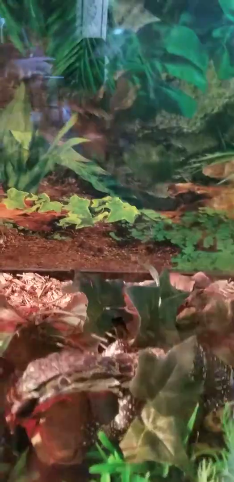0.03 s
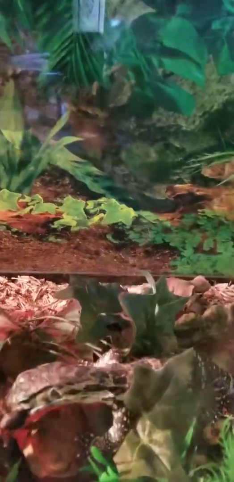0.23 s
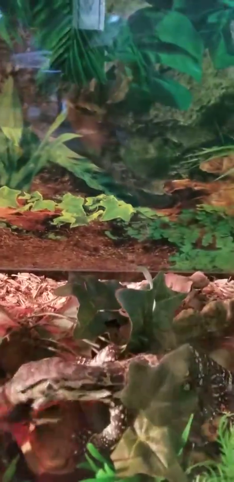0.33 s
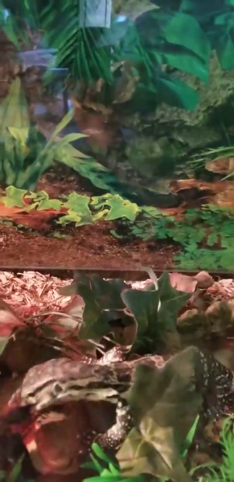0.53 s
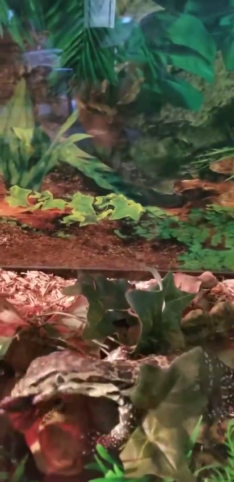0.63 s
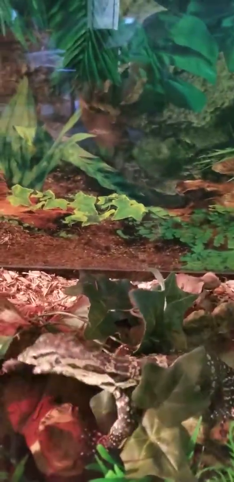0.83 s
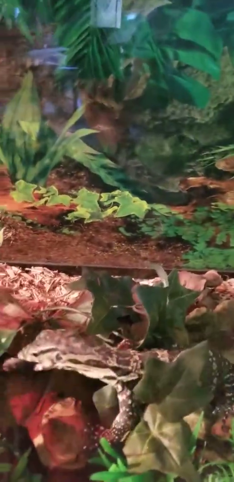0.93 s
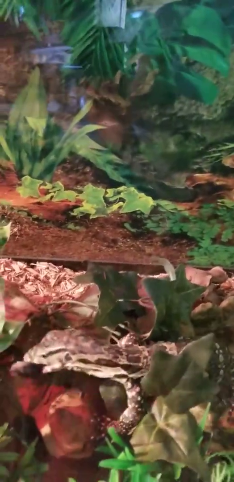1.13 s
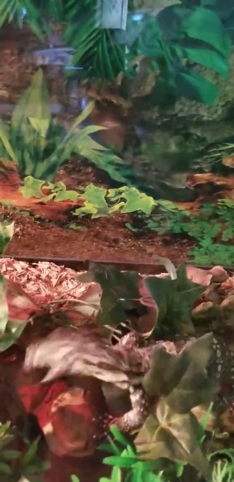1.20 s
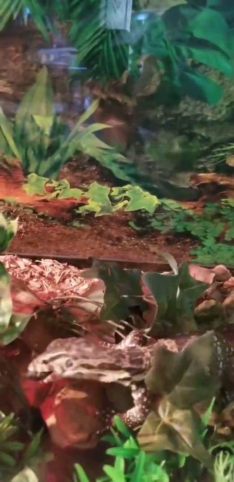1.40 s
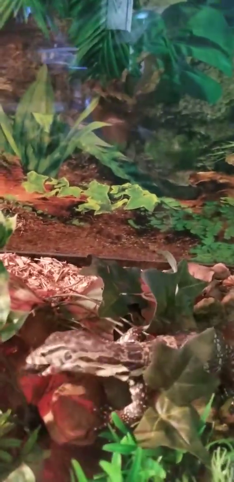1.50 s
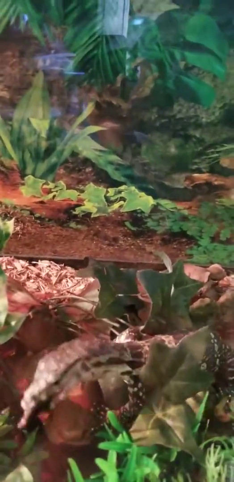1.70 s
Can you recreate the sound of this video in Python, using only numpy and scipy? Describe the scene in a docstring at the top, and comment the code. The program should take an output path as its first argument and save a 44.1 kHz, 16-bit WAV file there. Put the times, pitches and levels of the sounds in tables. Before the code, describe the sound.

Sharp, thumping knocks and a brief dry rustle as a lizard shifts in a terrarium.

```python
"""Knocks in a terrarium as a lizard shifts: one that rebounds in a quick clatter, then a single one.
Each is a deep thump of the enclosure and a hard crack that reaches the left first; the panels ring
briefly, and the walls, tank and room scatter the blow. A short dry rustle starts just ahead of the
knocks and fades under them: tiny slips excite hollow resonances and a dry fizz over a low rub.
Two dry touches leave a thin high ring. Underneath lie quiet room air and a faint mains hum."""
import sys
import numpy as np
from scipy import signal
from scipy.fft import rfft, irfft
from scipy.io import wavfile

SR = 44100
rng = np.random.default_rng(int(sys.argv[2]) if len(sys.argv) > 2 else 0)


def unload_audio(sound):
    """Save the sound as a 16-bit wav file, at the path given as the first command line argument."""
    columns = np.transpose(np.atleast_2d(sound))
    # keep every value between -1 and 1, then stretch to whole-number steps
    steps = np.round(np.clip(columns, -1, 1) * 32767)
    wavfile.write(sys.argv[1], SR, steps.astype(np.int16))


N = 77175

# the blows (time [s], thump gain [dB], crack gain [dB], crack tilt [dB/octave], panel ring gain [dB])
KNOCKS = [(.2220, -1.5, -7.5, 2.5, 10), (0.2497, -3, -7.5, 0.5, -4), (0.2634, -11.5, -16, -1, 3.5),
          (.2730, -20.5, -23.5, -9.5, 5.5), (0.8667, -5.5, -12.5, -1, 2.5)]
# tone of the enclosure's thump (frequency [Hz], gain [dB])
THUMP_EQ = [(15, -12.5), (40, 22), (75, 32.5), (150, 34.5), (300, 33), (460, 30.5), (600, 18.5),
            (1000, -11), (3000, -31), (16000, -72.5)]
# the thump leans left in the deep bass (frequency [Hz], left minus right [dB])
THUMP_PAN = [(40, 8.5), (90, 4), (180, 1.5), (300, 1), (500, -6)]
# tone of the crack on each side (frequency [Hz], gain [dB])
CRACK_LEFT_EQ = [(60, -40.5), (400, 10.5), (750, 26), (950, 6), (1300, 23.5), (2000, 17.5), (2400, 14),
                 (3800, 16), (5200, 13), (6300, 6), (7200, 9), (8500, -3.5), (10500, 0.5), (14000, -1.5),
                 (16500, -27.5)]
CRACK_RIGHT_EQ = [(60, -34.5), (400, 18.5), (740, 29.5), (1050, 22), (1700, 11.5), (2600, 22.5),
                  (3200, -20.5), (4000, 16.5), (5200, -3), (7000, -24), (9000, -26), (16500, -23.5)]
# panel modes (frequency [Hz], level [dB], t60 [s])
PANEL_MODES = [(72.4, -56.5, 0.81), (139, -42, .2), (196, -31, 0.078), (230.7, -44.5, 0.45),
               (324.7, -43, 0.38), (398, -42.5, .26), (834, -69, .3), (1256, -56.5, 0.17), (1275, -59, 0.2)]
# fader moves of the rustle (time [s], body level [dB], fizz level [dB], rub level [dB])
RUSTLE_FADERS = [(0, -60.5, -71, -59), (0.062, -58, -65, -51), (0.069, -41, -46.5, -53.5),
                 (.078, -40, -54, -51.5), (0.098, -36.5, -49, -53.5), (.143, -39, -51, -56),
                 (0.158, -35, -52, -44.5), (.208, -34.5, -59.5, -49), (0.223, -40.5, -62, -56),
                 (.295, -43, -64, -51), (.328, -43, -67, -48), (.34, -43.5, -56.5, -52),
                 (.39, -43, -59.5, -52.5), (.47, -49, -70.5, -61), (.55, -55, -82, -67.5),
                 (.65, -61, -78, -64), (.85, -72, -94, -83), (1.101, -100, -110, -77.5)]
# broad tone of the rustle's body (frequency [Hz], relative level [dB])
BODY_EQ = [(100, -50), (700, -30.5), (1050, -23.5), (1600, -17.5), (2500, -21.5), (4000, -34), (6000, -36),
           (8000, -48.5), (16000, -72)]
# hollow resonances in that body (frequency [Hz], width [Hz], left gain [dB], right gain [dB])
HOLLOW_MODES = [(1899, 43, -4.5, 2), (2040, 60, -7.5, -1.5), (2255, 32, -16, 4), (2597, 71, -12, -8.5),
                (3315, 150, -18, -18), (4450, 200, -30, -25), (5000, 150, -26, -18),
                (6590, 200, -23.5, -35.5)]
# tone of the dry fizz (frequency [Hz], relative level [dB])
FIZZ_EQ = [(100, -61), (3000, -8), (5000, 1.5), (6800, -6.5), (7900, -5), (8600, -13.5), (9300, -13.5),
           (9900, -1), (11500, -6), (12800, -2.5), (14000, -2), (15600, -7), (16300, -26)]
# the fizz is duller on the right (frequency [Hz], gain [dB])
FIZZ_RIGHT_EQ = [(3000, -3), (5500, -1.5), (8000, -23.5), (10000, -11), (16000, -25)]
# thin rings in the fizz (frequency [Hz], boost [dB])
FIZZ_RINGS = [(6600, 7.5), (7250, 8.5), (7890, -1), (9890, 3.5), (11100, 7), (12300, 4.5), (12800, 5.5)]
# tone of the low rub (frequency [Hz], relative level [dB])
RUB_EQ = [(20, -20.5), (60, -1.5), (130, -2.5), (250, -3.5), (550, -7), (800, -9.5), (1200, -19.5),
          (2500, -29), (4400, -16.5), (6000, -47), (16000, -65.5)]
# one touch opens the rustle, one is far fainter (time [s], level [dB], t60 [s], ring gain [dB])
TOUCHES = [(.065, -40, .06, -62), (.657, -67, .22, -58)]
# tone of the wash inside the tank (frequency [Hz], gain [dB])
TANK_EQ = [(300, -13.5), (1000, 11), (2700, 0.5), (4000, -12), (8000, -20)]
# room decay, floored at 0.02 s in use (frequency [Hz], t60 [s])
ROOM_T60 = [(60, 3), (300, 0.25), (1000, 3.8), (4000, -0.2), (16000, 18)]
# reverb send of the knocks (frequency [Hz], gain [dB])
ROOM_SEND = [(60, -31.5), (150, -19), (300, -23), (700, -34.5), (1300, -28), (2500, -22.5), (6000, -35),
             (16000, -35)]
# tone of the room air (frequency [Hz], relative level [dB])
AIR_EQ = [(15, -50), (28, -16), (60, 4.5), (110, -9), (160, -7.5), (235, -6), (290, -10.5), (370, -8.5),
          (520, -18.5), (780, -14.5), (1150, -36.5), (1700, -29), (2300, -19.5), (3200, -37), (4000, -28),
          (4650, -20), (6000, -37.5), (8300, -49), (12200, -32), (16000, -37.5)]
# left-right likeness of diffuse sound (frequency [Hz], correlation [-1..1])
LIKENESS = [(60, .55), (130, .72), (290, 1), (640, 0.43), (1410, -.25), (3100, 0), (15000, 0)]
# mains hum partials (frequency [Hz], rms level [dB])
HUM_PARTIALS = [(119.6, -67.5), (239.5, -68.5), (479.6, -70)]


def knocks(pivot_hz=900, bass_lag_hz=105, left_lag_s=.0003, right_lag_s=.00103):
    """Each blow thumps the enclosure, cracks on the left first and sets the panels ringing."""
    hz, t, out = bins(), np.arange(N) / SR, np.zeros((2, N))
    thump = causal(read(THUMP_EQ, hz))
    thump = thump * (bass_lag_hz - 1j * hz) / (bass_lag_hz + 1j * hz)  # all-pass: the bass lands late
    thump = thump * amp(np.array([[.5], [-.5]]) * read(THUMP_PAN, hz))
    crack = np.array([causal(read(CRACK_LEFT_EQ, hz)) * delay(left_lag_s),
                      -causal(read(CRACK_RIGHT_EQ, hz)) * delay(right_lag_s)])
    octaves = np.log2(np.maximum(hz / pivot_hz, 1))
    for s, thump_db, crack_db, tilt, ring_db in KNOCKS:
        blow = amp(thump_db) * thump + amp(crack_db) * crack * causal(tilt * octaves)
        out += irfft(blow * delay(s))[:, :N]
        for f, db, t60 in PANEL_MODES:
            out += amp(db + ring_db) * dying(s, t60) * np.sin(2 * np.pi * f * (t - s))
    return out


def rustle(ring_width_hz=70):
    """Slips excite a hollow body and a dry fizz, over a low rub of noise."""
    hz, t = bins(), np.arange(N) / SR
    power = amp(read(BODY_EQ, hz)) ** 2
    for f, width, left_db, right_db in HOLLOW_MODES:
        power = power + amp([[left_db], [right_db]]) ** 2 / (1 + ((hz - f) / width) ** 2) ** 2
    body = unit(filtered(slips(), np.sqrt(power)))
    rings_db = sum(db / (1 + ((hz - f) / ring_width_hz) ** 2) for f, db in FIZZ_RINGS)
    left_eq = read(FIZZ_EQ, hz) + rings_db
    right_eq = left_eq + read(FIZZ_RIGHT_EQ, hz)
    fizz = unit(filtered(close_reflections(slips()), amp([left_eq, right_eq])))
    s, body_db, fizz_db, rub_db = np.transpose(RUSTLE_FADERS)
    layers = [(body, body_db), (fizz, fizz_db), (diffuse(RUB_EQ), rub_db)]
    return sum(layer * amp(np.interp(t, s, db)) for layer, db in layers)


def slips(per_s=14000, spread_db=2.5):
    """A dense train of tiny slips of uneven size, separate on each side."""
    size = amp(spread_db * np.minimum(rng.exponential(1, (2, N)), 4))
    return size * rng.standard_normal((2, N)) * (rng.random((2, N)) < per_s / SR)


def close_reflections(x, t60=.025):
    """Short random reflections give the dry fizz many fine, fixed peaks."""
    reflections = rng.standard_normal((2, N)) * dying(0, t60)
    return filtered(x, rfft(reflections, 2 * N))


def touches(ring_hz=6920, rise_s=.09, ring_t60=.25, right_db=-8):
    """Dry touches: a burst of slips, then a thin high ring that swells and fades."""
    t, out = np.arange(N) / SR, np.zeros((2, N))
    for s, db, t60, ring_db in TOUCHES:
        fizz = unit(filtered(slips(), amp(read(FIZZ_EQ, bins()))))
        out += fizz * amp(db) * dying(s, t60)
        swell = np.clip((t - s) / rise_s, 0, 1) * dying(s, ring_t60)
        out += amp(ring_db) * swell * np.sin(2 * np.pi * ring_hz * t)
    return out * amp([[0], [right_db]])


def walls(x, scatter_db=-17, t60=.016, above_hz=900):
    """The near walls scatter the treble into a short tail."""
    tail = rng.standard_normal((2, N)) * dying(.001, t60)
    tail = tail / np.linalg.norm(tail, axis=1, keepdims=True)
    low_cut = (1j * bins() / (1j * bins() + above_hz)) ** 2
    return amp(scatter_db) * filtered(x, rfft(tail, 2 * N) * low_cut)


def tank(x):
    """Longer scatter inside the tank makes a midrange wash."""
    wash = walls(x, scatter_db=-24.5, t60=.2, above_hz=1400)
    return filtered(wash, amp(read(TANK_EQ, bins())))


def room(x):
    """The room returns a diffuse tail, each band dying at its own speed."""
    hz, t, noise = signal.stft(rng.standard_normal((2, N)), SR, nperseg=512)
    t60 = np.maximum(read(ROOM_T60, hz), .02)[:, None]
    decay = 1000 ** (-t / t60) * np.sqrt(2 * np.log(1000) / (t60 * SR))  # longer tails start softer
    tail = signal.istft(noise * decay * amp(read(ROOM_SEND, hz))[:, None], SR)[1][:, :N]
    tail[1] = filtered(tail[0], likeness()) + filtered(tail[1], np.sqrt(1 - likeness() ** 2))
    return signal.fftconvolve(x, tail, axes=1)[:, :N]


def room_tone(air_db=-60.5, lean_db=.97):
    """A steady bed of room air and mains hum, leaning slightly right."""
    t = np.arange(N) / SR
    hum = sum(np.sqrt(2) * amp(db) * np.sin(2 * np.pi * (f * t + rng.random()))
              for f, db in HUM_PARTIALS)
    return (amp(air_db) * diffuse(AIR_EQ) + hum) * amp([[-lean_db], [lean_db]])


def diffuse(eq):
    """Coloured noise, narrow in the lows and wide in the highs."""
    left, spread = rfft(rng.standard_normal((2, 2 * N)))
    right = likeness() * left + np.sqrt(1 - likeness() ** 2) * spread
    return unit(irfft(np.array([left, right]) * amp(read(eq, bins())))[:, :N])


def likeness():
    """How alike diffuse sound is on the two sides, by frequency."""
    return np.clip(read(LIKENESS, bins()), -1, 1)


def amp(db):
    """Decibels to gain."""
    return 10 ** (np.asarray(db) / 20)


def unit(x):
    """Scales to rms 1."""
    return x / np.sqrt(np.mean(x ** 2) + 1e-20)


def read(points, hz):
    """Reads a curve on a log-frequency axis."""
    f, value = np.transpose(points)
    return np.interp(np.log(hz + 1), np.log(f + 1), value)


def bins():
    """Frequencies of an FFT twice the scene's length."""
    return np.fft.rfftfreq(2 * N, 1 / SR)


def causal(db):
    """Minimum-phase EQ: nothing rings ahead of the attack."""
    log_gain = np.log(amp(db))
    mirrored = np.concatenate([log_gain, log_gain[-2:0:-1]])
    return np.exp(np.conj(signal.hilbert(mirrored)))[:N + 1]


def delay(s):
    """Response of a pure delay."""
    return np.exp(-2j * np.pi * bins() * s)


def filtered(x, response):
    """Passes a sound through a frequency response."""
    return irfft(rfft(x, 2 * N) * response)[..., :N]


def dying(s, t60):
    """Envelope that opens at time s and falls 60 dB in t60 seconds."""
    age = np.arange(N) / SR - s
    return (age >= 0) * np.exp(-np.log(1000) * np.maximum(age, 0) / t60)


def scene():
    """The mix: knocks and their reflections up front, then rustle, touches and room tone."""
    hits = knocks()
    return hits + tank(hits) + walls(hits) + room(hits) + rustle() + touches() + room_tone()


def record(dry, ceiling=.85, high_cut_hz=16500):
    """A soft clip rounds off the highest peaks, then a steep high cut limits the band."""
    rounded = dry / (1 + (dry / ceiling) ** 6) ** (1 / 6)
    high_cut = signal.firwin(401, high_cut_hz, window=("kaiser", 9), fs=SR)
    return signal.oaconvolve(rounded, high_cut[None], "same")


dry = scene()
out = record(dry)
unload_audio(out)
```